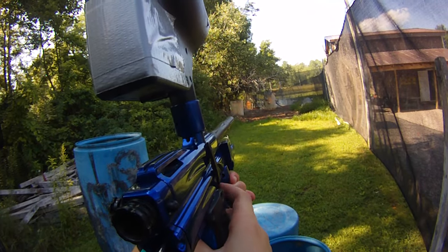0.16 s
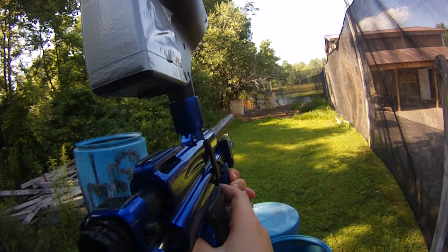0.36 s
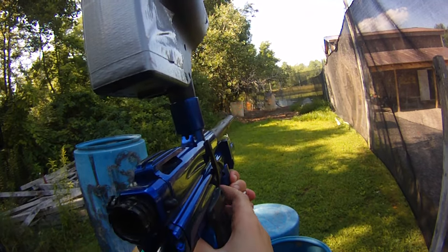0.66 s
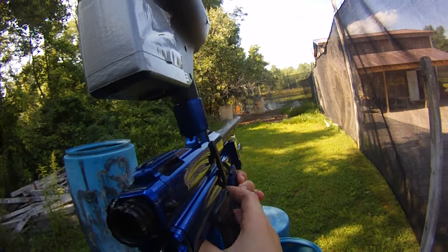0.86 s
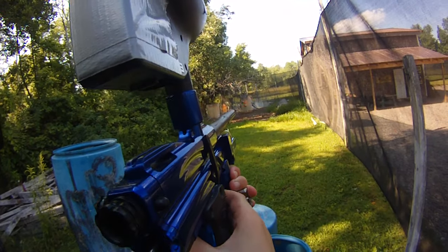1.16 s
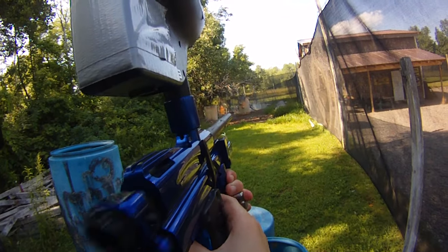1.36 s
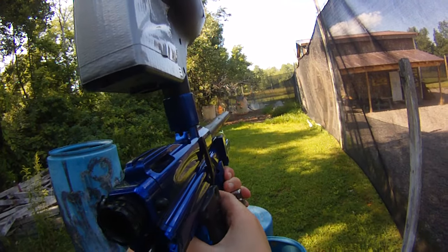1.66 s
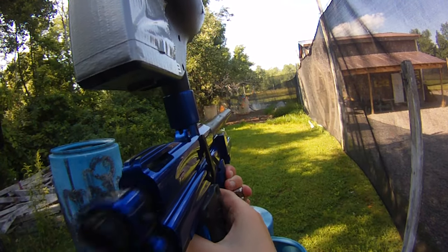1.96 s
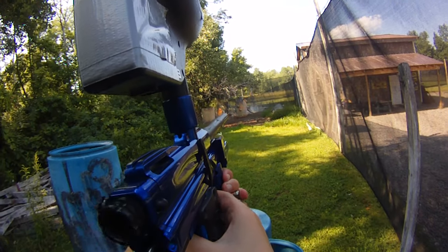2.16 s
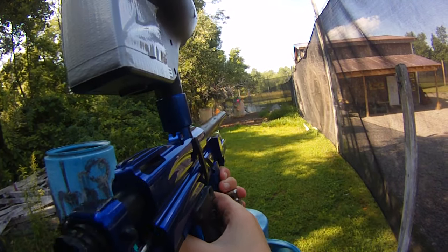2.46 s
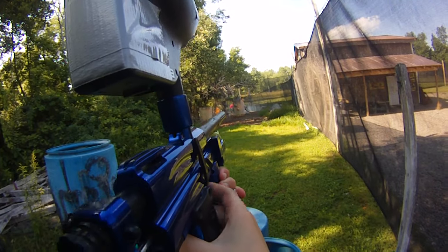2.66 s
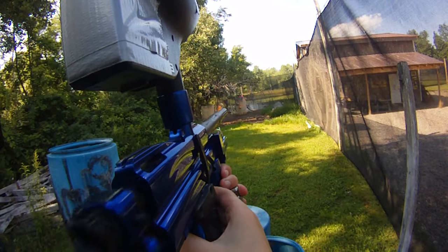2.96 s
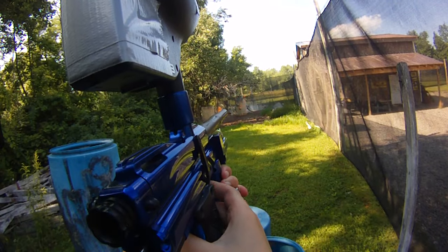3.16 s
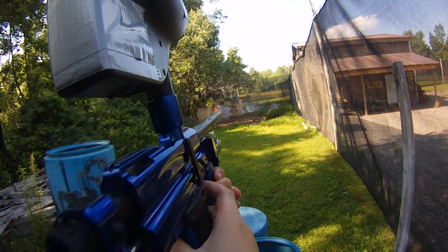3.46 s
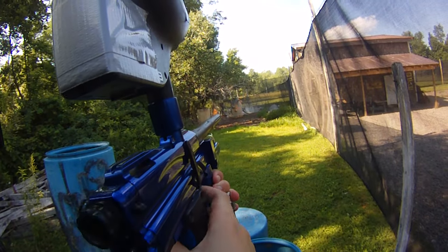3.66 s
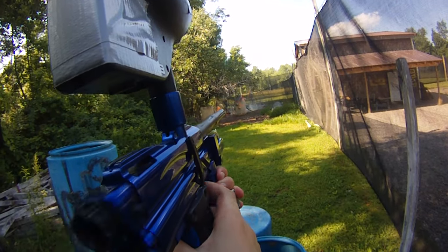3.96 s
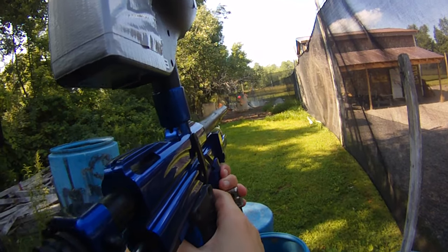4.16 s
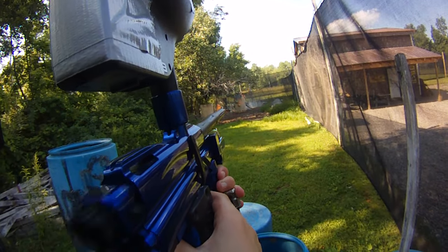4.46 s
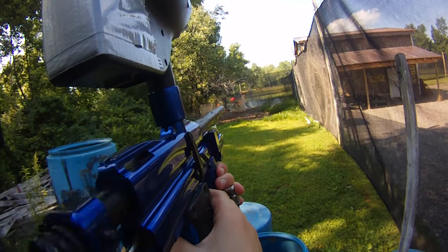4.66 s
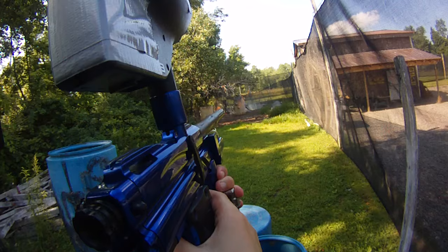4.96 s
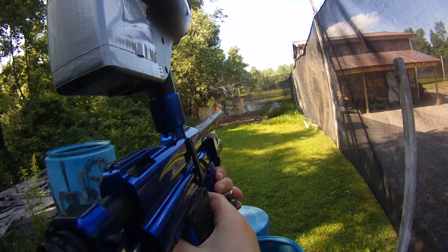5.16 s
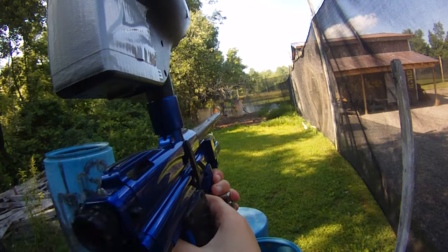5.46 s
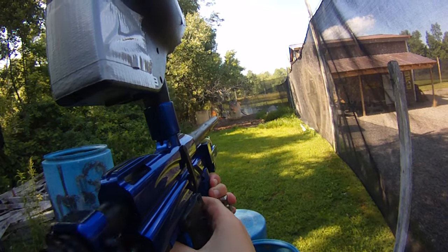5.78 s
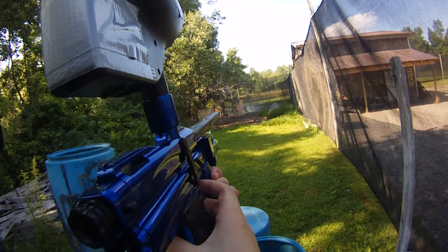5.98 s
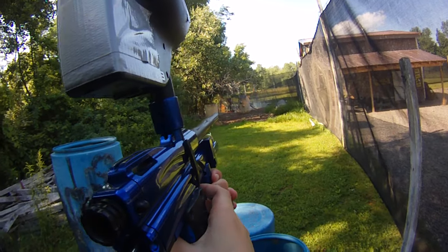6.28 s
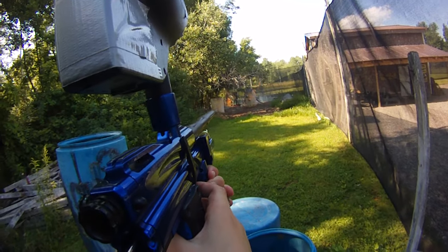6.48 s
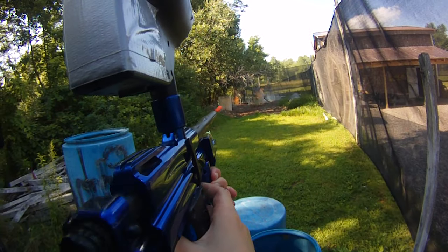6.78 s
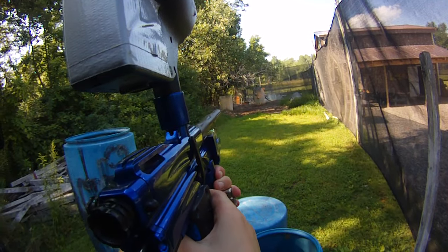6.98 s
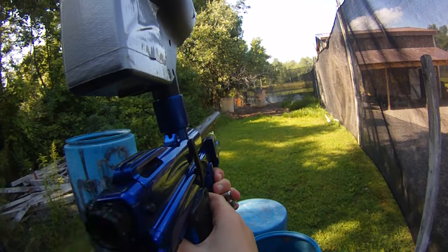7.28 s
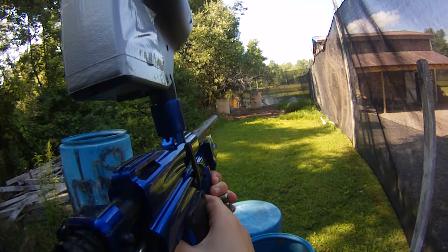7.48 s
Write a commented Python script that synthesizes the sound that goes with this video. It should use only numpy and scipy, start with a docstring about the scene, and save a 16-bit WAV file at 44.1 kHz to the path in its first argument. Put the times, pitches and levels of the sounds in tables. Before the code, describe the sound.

Very close to the microphone, a paintball marker fires quick, irregular strings of shots: a small trigger click, a hammer knock with a short hollow gas pop, then a bright metallic clack as the block shuts. A hopper motor whirrs faintly underneath, stirring paintballs. After about six seconds the firing stops, the motor runs down amid tiny ticks, then restarts with a final string. Quiet open field, faint echo from trees.

```python
"""On a grass field a pump-block paintball marker is fired in quick strings, close to the microphone.
Pulling the trigger gives a click, the hammer's blow and a pop of gas; letting go switches a valve and
the block clacks shut. Blows are noise bursts and damped modes of the barrel, body and block.
The hopper's motor whines and whirrs and stirs the paintballs, running down in the pause.
The tree line returns a faint scattered echo, one far wall a weak slap, and the outdoor air is quiet."""
import sys
import numpy as np
from scipy import signal
from scipy.fft import rfft, irfft, next_fast_len
from scipy.io import wavfile
from scipy.ndimage import map_coordinates

SR = 44100
rng = np.random.default_rng(int(sys.argv[2]) if len(sys.argv) > 2 else 0)


def wav_record(signal):
    """Record a signal, one row per channel, as 16-bit PCM in the file named by sys.argv[1]."""
    frames = np.transpose(np.atleast_2d(signal))
    bounded = np.clip(frames, -1, 1)
    # unit amplitude maps onto the largest positive 16-bit level
    quanta = np.round(bounded * 32767).astype(np.int16)
    wavfile.write(sys.argv[1], SR, quanta)


N = 336257
T = np.arange(SR // 16) / SR  # seconds within one blow

# trigger cycles, played by hand: hammer_s, block_shut_s, strength_db
CYCLES = [(0.245, 0.3233, 4), (0.4084, 0.4866, 4.5), (0.5043, 0.5633, 2.5), (0.575, 0.635, 0),
          (0.6483, 0.7086, -2.5), (0.9499, 1.0299, 1.5), (1.0496, 1.115, 0), (1.125, 1.2033, -3),
          (1.26, 1.3359, 1.0), (1.379, 1.4442, 2), (1.4544, 1.5256, -1), (1.6024, 1.68, -0.5),
          (1.7457, 1.8256, 1.0), (1.836, 1.899, -1), (1.9081, 1.975, -4.5), (1.9846, 2.0474, -3.5),
          (2.0567, 2.122, -1.5), (2.2595, 2.3305, 0), (2.3405, 2.4254, -2), (2.433, 2.494, -2),
          (2.5102, 2.5743, -1.0), (2.646, 2.7136, 1.5), (2.7224, 2.7963, 0), (2.8042, 2.8842, -0.0),
          (2.894, 2.9681, -1.5), (2.983, 3.0477, -1), (3.0622, 3.132, -2), (3.141, 3.2187, -0.5),
          (3.3606, 3.4341, -0.0), (3.4433, 3.5166, -2), (3.5284, 3.5914, -3), (3.615, 3.6954, 1),
          (3.782, 3.8555, 1.5), (3.8744, 3.9612, -0.5), (3.9702, 4.0412, -0.5), (4.0505, 4.1185, -1.5),
          (4.1275, 4.2041, -3), (4.2121, 4.2725, -2.0), (4.281, 4.3747, -1), (4.466, 4.543, 2.5),
          (4.552, 4.611, -2.5), (4.634, 4.6936, 0.5), (4.7208, 4.8123, 1.5), (4.8843, 4.9517, 1.5),
          (5.0435, 5.1203, 2.5), (5.203, 5.276, 2.5), (5.298, 5.3695, 1.5), (5.3798, 5.4463, -2),
          (5.456, 5.5377, -2.5), (5.5452, 5.617, -3), (5.6725, 5.752, 1.5), (5.8032, 5.881, 3.5),
          (5.8896, 5.9515, 1.5), (5.9612, 6.026, -1.5), (6.7463, 6.8166, 2.0), (6.845, 6.917, 3.5),
          (6.933, 6.9995, 1), (7.1157, 7.1974, 3), (7.2056, 7.28, -1), (7.29, 7.3555, -1.5),
          (7.366, 7.437, -0.5), (7.5295, 7.5943, 1.5)]
# colour of gas let out: frequency_hz, relative_density_db (per Hz)
GAS_COLOUR = [(60, -43), (300, -1), (620, 4.5), (1000, -1), (1400, 1.5), (1900, 3), (2450, -4.5),
              (3000, -12), (3600, -16), (4500, -24), (7000, -15), (14000, -29)]
# colour of the marker's small parts rattling: frequency_hz, relative_density_db (per Hz)
RATTLE_COLOUR = [(100, -32.5), (400, -7), (900, 2.5), (1700, -8), (2500, 4.5), (3600, -2), (4500, -5.5),
                 (5900, -6.5), (6900, 0.5), (9500, -2), (11000, -4.5), (14500, -5.5)]


def amp(db):
    """Amplitude factor of a level in dB."""
    return 10 ** (np.asarray(db) / 20)


def unit(x):
    """x scaled to rms 1."""
    return x / np.sqrt(np.mean(x ** 2) + 1e-20)


def gain(points, size):
    """Gain on an FFT grid, drawn through (Hz, dB) points along log frequency."""
    hz, db = np.transpose(points)
    grid_hz = np.fft.rfftfreq(size, 1 / SR)
    return amp(np.interp(np.log(grid_hz + 1), np.log(hz), db))


def noise(colour, size):
    """Coloured noise of rms 1: a set spectrum with random phases."""
    spectrum = gain(colour, size)
    phase = 2 * np.pi * rng.random(len(spectrum))
    return unit(irfft(spectrum * np.exp(1j * phase), size))


def coloured(x, colour):
    """x heard through a colour."""
    size = next_fast_len(N + SR)
    return irfft(rfft(x, size) * gain(colour, size), size)[:N]


def fade(t60, attack, hold=0):
    """A quick rise, held while the drive lasts, then an exponential decay (all in seconds)."""
    decay = np.exp(-np.log(1000) * np.maximum(T - hold, 0) / t60)
    return decay * (1 - np.exp(-T / attack))


def wobble(rate):
    """A smooth random curve, rate knots a second."""
    knots = rng.standard_normal(int(N * rate / SR) + 4)
    return map_coordinates(knots, [np.arange(N) * rate / SR])


def add(track, s, sound):
    """Mix a sound in at a time in seconds."""
    i = int(np.clip(round(s * SR), 0, N))
    track[i:i + len(sound)] += sound[:N - i]


def burst(colour, db, t60, attack):
    """A dying puff of noise."""
    return amp(db) * fade(t60, attack) * noise(colour, len(T))


def ring(modes, attack, scatter_db, detune, smear, hold=0):
    """Damped modes, a little different at every blow; neighbours swing against each other."""
    chance = rng.standard_normal((len(modes), 3))
    out = np.zeros(len(T))
    for k, ((hz, db, t60), (a, b, c)) in enumerate(zip(modes, chance)):
        level = (-1) ** k * amp(db + scatter_db * a)
        swing = np.sin(2 * np.pi * hz * (1 + detune * b) * T + smear * c)
        out += level * fade(t60, attack, hold) * swing
    return out


def outdoor_air():
    """Quiet air of the open field: steady coloured noise."""
    # colour of the air: frequency_hz, relative_density_db (per Hz)
    air_colour = [(40, -15.5), (200, -13), (450, 4), (1000, 2), (1900, -9.5), (3000, -29), (14000, -28)]
    return amp(-72.5) * noise(air_colour, N)


def motor_speed(t):
    """Share of full speed: friction slows the motor evenly once off; it picks up quickly when switched on."""
    off_s, on_s = 6.308, 6.75  # the motor rests while the trigger does
    coast_s, spin_up_s = .45, 0.038  # full speed to rest at that slope; time constant of the restart
    idle_speed = .1  # lowest share of full speed
    coasting = np.clip(1 - (t - off_s) / coast_s, idle_speed, 1)
    return 1 - (1 - coasting) * np.exp(-np.maximum(t - on_s, 0) / spin_up_s)


def hopper(tumble_rate, whirr_db, whine_db, tumble_db, flutter_db):
    """Gears whine and churn in the plastic shell; the paddle tumbles the balls, denser when it turns faster."""
    # the motor's whine: multiple_of_mesh, relative_level_db
    whine_partials = [(1, -10), (2, -25.5), (3, -31), (5, -34), (6, -30.5), (7, -35.5), (10, -36.5),
                      (12, -36.5)]
    # the hopper's plastic shell: frequency_hz, relative_density_db (per Hz)
    shell_colour = [(60, -44), (170, -30.5), (300, -3), (450, -3.5), (650, -3), (1020, 1), (1220, -9),
                    (1450, -2), (1750, -7.5), (2200, -15.5), (3100, -24.5), (4500, -36.5), (9500, -35),
                    (15000, -44)]
    # soft paintballs knock without treble: frequency_hz, gain_db
    soft_ball = [(2000, -4.5), (4000, -8.5), (12000, -14)]
    # paintballs knocking in the hopper: start_s, relative_level_db
    ball_bumps = [(.062, -30), (.83, -39), (6.09, -36), (6.262, -33.5), (6.37, -34.5), (6.56, -50),
                  (6.883, -31)]
    # course of the hopper's level, before speed and layer levels: time_s, relative_level_db
    level_course = [(0, -42), (.35, -44.5), (.8, -46), (3.3, -46.5), (4.4, -43.5), (5.9, -43), (6.27, -49),
                    (7.62, -43.5)]
    full_mesh_hz = 1022  # nominal gear mesh at full speed
    speed_law = 1.83  # the amplitude goes with this power of the speed

    t = np.arange(N) / SR
    speed = motor_speed(t)
    level = amp(np.interp(t, *np.transpose(level_course))) * speed ** speed_law

    # load and backlash shake the speed
    shake = 0.022 * wobble(30) + .018 * wobble(500)
    turn = 2 * np.pi * np.cumsum(full_mesh_hz * speed * (1 + shake)) / SR
    partials = sum(amp(k_db) * np.sin(k * turn) for k, k_db in whine_partials)
    whine = amp(3.4 * wobble(60)) * partials
    whirr = noise(shell_colour, N) * amp(flutter_db * wobble(70))

    touched = rng.random(N) < tumble_rate * speed / SR
    touches = touched * rng.standard_normal(N)
    # each touch shakes its neighbours
    jostle = fade(t60=.02, attack=0.00015) * rng.standard_normal(len(T))
    tumble = signal.fftconvolve(touches, jostle)[:N]
    tumble = unit(coloured(coloured(tumble, shell_colour), soft_ball))

    out = level * (amp(whirr_db) * whirr + amp(whine_db) * whine + amp(tumble_db) * tumble)
    for s, bump_db in ball_bumps:
        add(out, s, burst(shell_colour, db=bump_db, t60=0.055, attack=0.0016))
    return out


def knock(db):
    """A blow on the marker's body sets its damped modes ringing."""
    # modes of the marker's body: frequency_hz, relative_level_db, t60_s
    body_modes = [(297, -36, 0.074), (509, -28, 0.037), (821, -35, 0.01), (1230, -47.5, .016),
                  (1370, -29, 0.02), (1754, -13, 0.011), (2096, -14.5, 0.0091), (2398, -11, 0.0075)]
    return amp(db) * ring(body_modes, attack=0.00019, scatter_db=2.0, detune=0.0054, smear=0.65)


def shots():
    """The trigger slides, the sear clicks; the hammer lets gas out of the barrel; the block hits its rear stop."""
    # air in the barrel and breech: frequency_hz, relative_level_db, t60_s
    barrel_modes = [(123, -27, 0.04), (211.6, -20.5, 0.026), (293, -28.5, 0.06), (369, -14, 0.021),
                    (504.5, -14.5, 0.029), (733, -26, 0.021), (844, -25.5, 0.037), (1188, -22, 0.011),
                    (1357, -24, 0.033), (1665, -24, 0.06), (1890, -22.5, 0.013)]
    # colour of the sear's click: frequency_hz, relative_density_db (per Hz)
    sear_colour = [(100, -27.5), (500, -29.5), (750, 7), (1000, -17), (1400, 10), (2000, -7), (3000, -4.5),
                   (4600, -21.5), (7000, -11), (9700, -17.5), (14500, -14)]
    out = np.zeros(N)
    for s, _, strength_db in CYCLES:
        # one strength drives pop and hammer, each growing at its own rate
        pop = amp(-0.28 + 0.99 * strength_db)
        hammer = amp(-0.8 + 0.96 * strength_db)

        slide = burst(RATTLE_COLOUR, db=-42 + rng.normal(0, 3), t60=.025, attack=.003)
        add(out, s - .015 + rng.normal(0, .003), slide)
        add(out, s - .0072, burst(sear_colour, db=-19.5, t60=0.015, attack=0.00062))
        blow = burst(RATTLE_COLOUR, db=-9.5, t60=0.0053, attack=0.00059) + knock(db=-9)
        add(out, s, hammer * blow)

        # the gas drives the barrel for as long as the valve stays open
        barrel = ring(barrel_modes, attack=0.00086, scatter_db=2.27, detune=0.0038, smear=0.1, hold=0.007)
        add(out, s, pop * amp(-8.5) * barrel)
        add(out, s, pop * burst(GAS_COLOUR, db=-10.5, t60=0.041, attack=0.0069))
        add(out, s + .0048, pop * burst(RATTLE_COLOUR, db=-27.5, t60=0.0052, attack=.0008))

        rear_stop = burst(RATTLE_COLOUR, db=-19.5, t60=0.02, attack=0.0009) + knock(db=-24.0)
        add(out, s + 0.0075, hammer * rear_stop)
    return out


def field(dry, scatter_db, wall_db, wall_delay):
    """Trees scatter each stretch of sound anew; one far wall gives a weak slap."""
    # colour of sound off the tree line: frequency_hz, relative_level_db
    tree_colour = [(80, -28), (200, -13.5), (400, -8.5), (1000, 0.5), (1500, -5), (2200, -12),
                   (3200, -18.5), (6000, -23.5), (15000, -30.5)]
    # strength of the echo by its delay: delay_s, relative_level_db
    echo_strength = [(0, 10), (.03, 5.5), (.1, 1), (.3, -6), (.45, -12.5), (.6, -16), (.9, -54.5)]
    out, t = np.zeros(N), np.arange(SR) / SR
    spread = amp(np.interp(t, *np.transpose(echo_strength)))
    step = SR // 4
    for i in range(0, N, step):
        tail = noise(tree_colour, SR) * spread
        tail = tail / np.linalg.norm(tail)
        add(out, i / SR, amp(scatter_db) * signal.fftconvolve(dry[i:i + step], tail))
    add(out, wall_delay, amp(wall_db) * coloured(dry, tree_colour))
    return out


def clink(db):
    """Metal meeting the block sets its short, bright modes ringing."""
    # modes of the metal block: frequency_hz, relative_level_db, t60_s
    block_modes = [(2722, -21, 0.0094), (3430, -13.5, 0.006), (5320, -11.5, 0.0039), (6180, -16.5, 0.0055),
                   (7226, -13.5, 0.0047), (8130, -21, 0.01), (9610, -8, 0.0035), (11030, -18.5, 0.0057),
                   (12330, -8.5, 0.0056), (13760, -9, 0.006), (14750, -21, 0.0057)]
    return amp(db) * ring(block_modes, attack=0.00064, scatter_db=0.96, detune=0.0033, smear=0.83)


def closes():
    """The trigger slides back and the valve ticks; the block runs forward, clacks shut and rebounds once."""
    out = np.zeros(N)
    for _, s, strength_db in CYCLES:
        # the cycle's strength drives body and treble, each growing at its own rate
        body_db = 1.66 + .83 * strength_db
        treble_db = 1.03 + 0.68 * strength_db

        slide = burst(RATTLE_COLOUR, db=-37 + rng.normal(0, 3), t60=.03, attack=.003)
        add(out, s - .021 + rng.normal(0, .003), slide)
        valve_s = s - .0128
        valve_tick = burst(RATTLE_COLOUR, db=-25.5, t60=0.024, attack=0.0002) + knock(db=-12.5)
        add(out, valve_s, valve_tick)
        add(out, valve_s, burst(GAS_COLOUR, db=-27, t60=0.076, attack=0.0013))

        add(out, s, knock(db=body_db + 1.0) + clink(db=treble_db + 3.5))
        add(out, s, amp(treble_db) * burst(RATTLE_COLOUR, db=-11.5, t60=0.0095, attack=0.0005))
        rebound = burst(RATTLE_COLOUR, db=-27.5, t60=0.0073, attack=0.00017) + knock(db=-19.5)
        add(out, s + 0.0075, rebound)
    return out


def ticks():
    """Small parts touch between shots: short bursts of rattle."""
    # faint ticks of the trigger and hopper: start_s, relative_level_db
    tick_times = [(0.883, -28), (0.922, -31), (6.0937, -29), (6.2168, -36), (6.3727, -36), (6.7072, -42.5)]
    out = np.zeros(N)
    for s, db in tick_times:
        add(out, s, amp(db) * burst(RATTLE_COLOUR, db=-14, t60=0.012, attack=.0003))
    return out


def scene():
    """Marker and hopper close by, the marker's echo from the field's edge, and the air."""
    feed = hopper(tumble_rate=110, whirr_db=-2.5, whine_db=1, tumble_db=-2.5, flutter_db=1.5)
    marker = shots() + closes() + ticks()
    echo = field(marker, scatter_db=-28.5, wall_db=-23.5, wall_delay=0.41)
    return (marker + feed + echo + outdoor_air())[None]


def record(dry):
    """The microphone's housing colours the sound; the recorder cuts rumble, rounds peaks and limits the band."""
    # dips of the microphone's housing: centre_hz, width_hz, gain_db
    housing_dips = [(631, 66, -5.5), (2880, 130, -5), (4450, 180, -3.5), (5890, 390, -5)]
    low_cut_hz, top_hz = 70, 15400
    for hz, width_hz, db in housing_dips:
        band = signal.lfilter(*signal.iirpeak(hz, hz / width_hz, fs=SR), dry)
        dry = dry + (amp(db) - 1) * band
    low_cut = signal.butter(2, low_cut_hz, "highpass", fs=SR, output="sos")
    dry = signal.sosfilt(low_cut, dry)
    rounded = dry / (1 + np.abs(dry / .9) ** 6) ** (1 / 6)  # only the highest peaks bend
    band_limit = signal.ellip(8, .05, 60, top_hz, fs=SR, output="sos")
    return signal.sosfiltfilt(band_limit, rounded)


dry = scene()
out = record(dry)
wav_record(out)
```